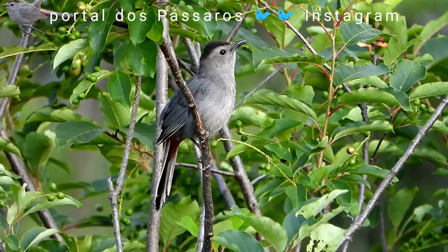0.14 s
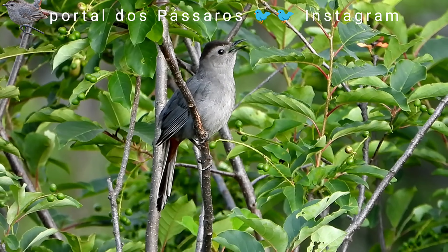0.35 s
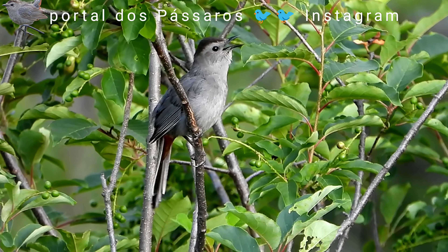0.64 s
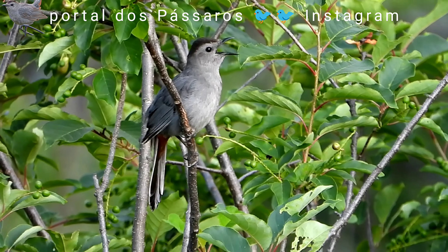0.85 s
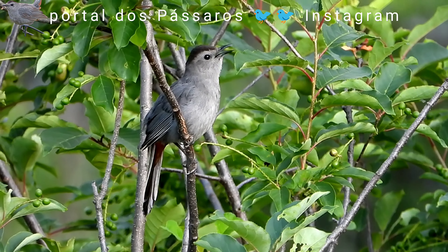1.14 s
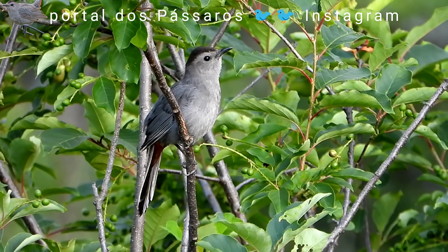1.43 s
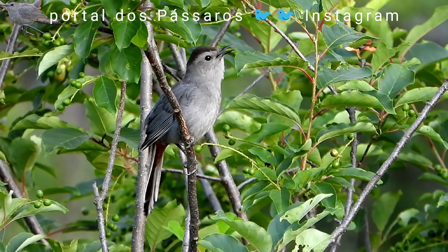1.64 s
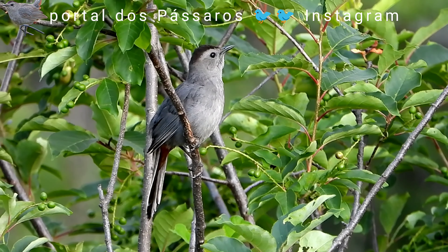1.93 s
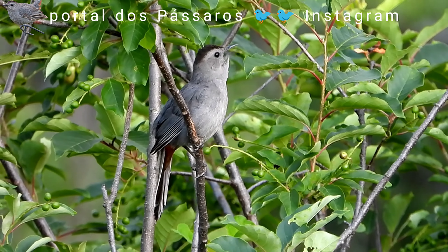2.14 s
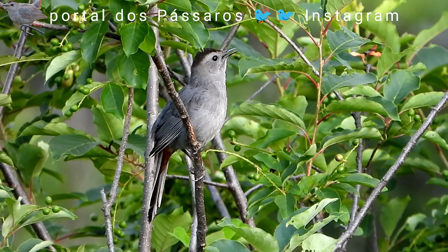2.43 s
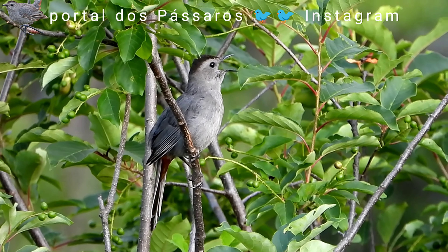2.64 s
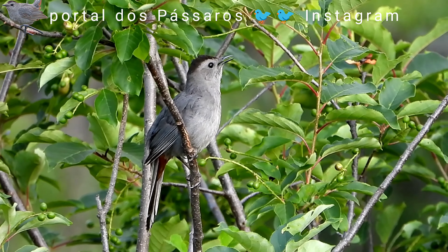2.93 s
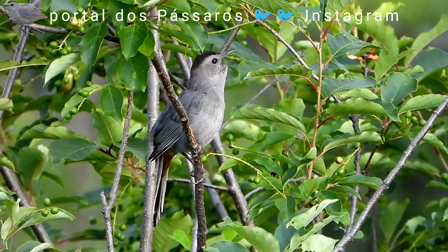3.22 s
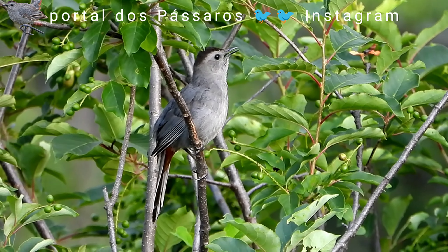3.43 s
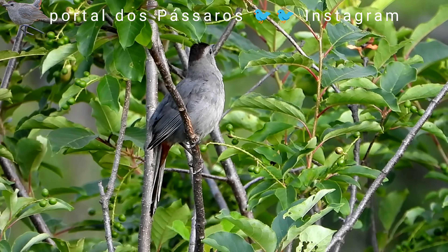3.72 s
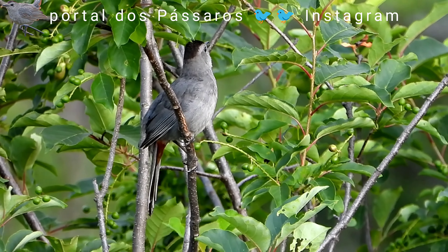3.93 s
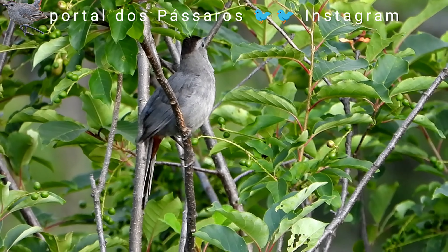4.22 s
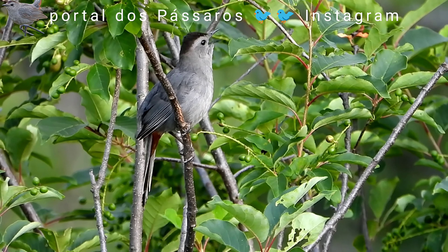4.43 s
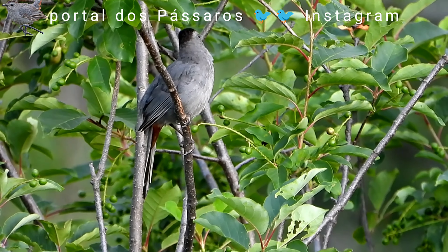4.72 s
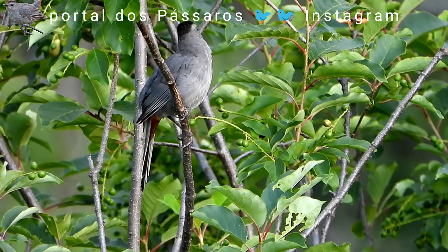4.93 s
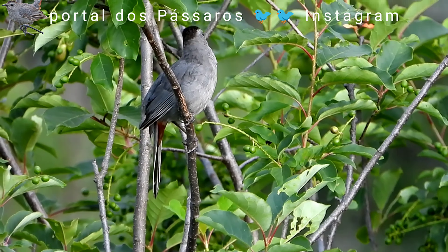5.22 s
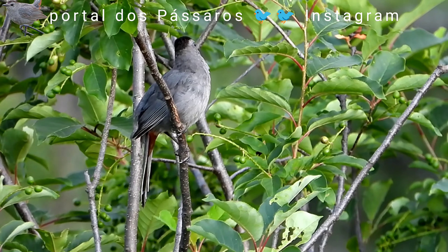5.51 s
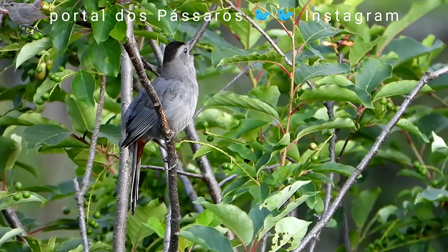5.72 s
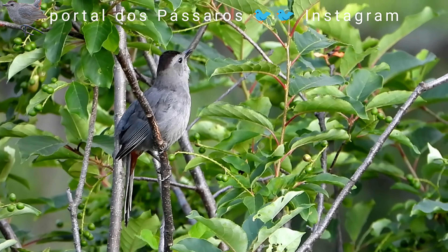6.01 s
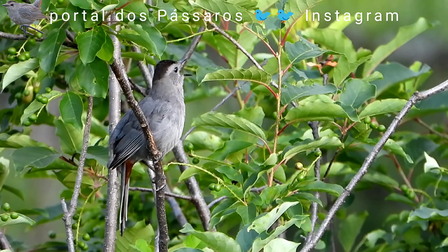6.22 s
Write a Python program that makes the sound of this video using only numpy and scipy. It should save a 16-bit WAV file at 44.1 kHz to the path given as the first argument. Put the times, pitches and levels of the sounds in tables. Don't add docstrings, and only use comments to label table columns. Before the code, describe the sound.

Rapid jumbled birdsong outdoors: sharp chirps, squeaky twitters, hoarse churrs and bending whistles, with faint neighbouring birds and distant traffic behind.

```python
import sys
import numpy as np
from scipy import signal
from scipy.io import wavfile
from scipy.ndimage import uniform_filter1d, minimum_filter1d, map_coordinates

SR = 44100
rng = np.random.default_rng(int(sys.argv[2]) if len(sys.argv) > 2 else 0)


def rack_gain(trim_db):
    fader = np.asarray(trim_db, float)
    return 10 ** (fader / 20)


def file_out(sig):
    cols = np.atleast_2d(sig).T
    lim = np.clip(cols, -1, 1)
    pcm = np.round(lim * 32767).astype(np.int16)
    wavfile.write(sys.argv[1], SR, pcm)


N = 280917
LEFT_RIGHT = np.array([[1], [-1]])


def unit(x):
    return x / np.sqrt(np.mean(x ** 2))


def walk(rate_hz, size):
    hold = int(SR / rate_hz)
    steps = np.repeat(rng.standard_normal(size // hold + 3), hold)
    slewed = uniform_filter1d(uniform_filter1d(steps, hold), hold)
    return unit(slewed)[hold:hold + size]


def patches(shape, bins, frames):
    field = uniform_filter1d(rng.standard_normal(shape), bins, axis=0)
    return unit(uniform_filter1d(uniform_filter1d(field, frames, axis=1), frames, axis=1))


def band_pass(x, hz, width_hz):
    edges = np.clip([hz - width_hz / 2, hz + width_hz / 2], 15, SR / 2 - 500)
    return signal.sosfilt(signal.butter(3, edges, "bandpass", fs=SR, output="sos"), x)


def add(out, start_s, sound):
    first = max(int(start_s * SR), 0)
    n = min(sound.shape[1], N - first)
    out[:, first:first + n] += sound[:, :n]


# time_s, level_db
ROAD = [(0.0, -33.5), (0.03, -39), (0.89, -35.5), (0.9, -39.5), (1.76, -43), (1.81, -39), (2.52, -43),
        (3.05, -38.5), (3.14, -43), (3.73, -46), (4.45, -41.5), (5.2, -48), (5.43, -44), (6.37, -47)]
# pitch_hz, level_db (per Hz)
AIR = [(15, -62), (25, -31), (70, -29), (203, -4.5), (430, -8), (843, 2), (1230, -4), (1830, -9),
       (2460, -7), (7030, -25.5), (7960, -25.5), (9720, -56.5), (12600, -112), (21400, -120)]
# pitch_hz, side_minus_mid_db
AIR_WIDTH = [(30, -6), (70, -2), (150, -7), (280, -17), (600, -21), (1100, -12), (2500, -9), (5000, -3),
             (9000, -1)]


def background(level_db=-39.5):
    hz, t, (mid, side) = signal.stft(rng.standard_normal((2, N)), SR, nperseg=2048)
    s, roar_db = np.transpose(ROAD)
    roar = np.interp(t, s, roar_db - roar_db.mean())
    hz = hz[:, None] + 1
    air_hz, air_db = np.transpose(AIR)
    air = np.interp(np.log(hz), np.log(air_hz), air_db)
    width_hz, width_db = np.transpose(AIR_WIDTH)
    side_db = np.interp(np.log(hz), np.log(width_hz), width_db)
    traffic = roar * np.clip(np.minimum(2200 / hz - .4, (hz - 130) / 400), 0, 1)
    streaks = 4.3 * patches(mid.shape, bins=4, frames=3) + 0.9 * patches(mid.shape, bins=30, frames=8)
    streaks = streaks + np.clip(hz / 3000 - 1, 0, 2) * 1.5 * patches(mid.shape, bins=70, frames=10)
    gusts = np.clip(250 / hz, 0, 3) * 1.3 * patches(mid.shape, bins=8, frames=2)
    spread = mid + rack_gain(side_db) * side * LEFT_RIGHT[:, :, None]
    both = rack_gain(air + traffic + streaks + gusts) * spread
    return unit(signal.istft(both, SR, nperseg=2048)[1][:, :N]) * rack_gain(level_db)


# pitch_hz, start_s, end_s, level_db
DRONES = [
    (484, 0.0, .7, -53),
    (484, 1.5, 2.2, -55),
    (240, 5.68, 5.93, -52),
    (570, 5.6, 5.95, -55),
]


def drones():
    t, out = np.arange(N) / SR, 0
    for hz, start, end, db in DRONES:
        swell = np.clip(np.minimum(t - start + 0.019, end - t) / 0.012, 0, 1)
        level = swell * rack_gain(db + 3.5 * walk(7.7, N))
        pitch = hz + 4 * walk(1.6, N) + 2.5 * walk(30, N)
        out = out + level * np.sin(2 * np.pi * np.cumsum(pitch) / SR)
    return out


def whistle(note, octave_db, pan_db, rough, edge_s=0.006):
    s, hz, db = np.transpose(note)
    t = s[0] - edge_s + np.arange(int((s[-1] - s[0] + 2 * edge_s) * SR)) / SR
    pitch = uniform_filter1d(np.interp(t, s, hz), size=100, mode="nearest")
    tremor_hz = 260 * rough ** 1.5 * walk(400, len(t))
    phase = 2 * np.pi * np.cumsum(pitch + tremor_hz) / SR
    flutter = 1 + .95 * rough * walk(260, len(t))
    flutter = flutter + (.04 + .5 * rough) * walk(1500, len(t))
    fade = np.clip(np.minimum(t - t[0], t[-1] - t) / (2 * edge_s), 0, 1)
    side = LEFT_RIGHT / 2
    lead = 0.39 * pan_db * side
    throat_db = -9 * np.abs(np.log2(2 * pitch / 5600)) / 0.7
    unsteady_db = 4 * walk(70, len(t)) * (octave_db < -12)
    second = rack_gain(octave_db + throat_db - throat_db.max() + unsteady_db)
    third = rack_gain(1.9 * min(octave_db, 0) - 18) * (3 * pitch < 15000)
    tone = np.sin(phase + lead) + second * np.sin(2 * phase + lead)
    tone = tone + third * (np.sin(3 * phase) + rack_gain(-10.5) * np.sin(4 * phase))
    even_power = np.sqrt(2 / (1 + second ** 2) / (1 + (0.49 * rough) ** 2))
    level = rack_gain(np.interp(t, s, db) + pan_db * side) * even_power
    return s[0] - edge_s, tone * level * flutter * np.sin(fade * np.pi / 2) ** 2


# time_s, left_minus_right_db
HEAD = [(0.0, 2), (0.34, 1.5), (0.41, 5.5), (0.64, -4), (0.71, 2.5), (0.76, 1.5), (1.42, 1.5), (2.02, 2),
        (2.04, 0.5), (3.28, 2), (5.45, 0.5), (5.52, 5.5), (6.1, 2), (6.37, 1.5)]
# octave_db, roughness (0-1), and for crisp notes edge_s
CLEAR, SQUEAKY, HOARSE, FAINT, BREATHY = (-33, .13), (8, .09), (-40, .8), (-42, .12), (-42, .45)
REEDY, SCRATCHY, RINGING, SMOOTH = (-17, .2), (-40, .6), (-27, .1), (-36, .04)
BEATING, CRISP = (-32, .15), (-32, .24, .002)


def sing(out, voice, notes):
    octave_db, rough, *edge_s = voice
    for note in notes:
        pan_db = np.interp(note[1][0], *np.transpose(HEAD))
        add(out, *whistle(note, octave_db, pan_db, rough, *edge_s))


# length_share, share_of_way_to_last_pitch, first_pitch_factor, swell_db
SLIDE = [(0, 0, 1, -6), (.42, .42, 1, 0), (1, 1, 1, -7)]
HOOK = [(0, 0, 1, -5), (.3, .92, 1, 0), (1, 1, 1, -6)]
ARCH = [(0, 0, .92, -4), (.3, 0, .995, 0), (.6, .15, 1, -1), (1, 1, 1, -2.5)]


def gesture(shape, start, length, first, last, db):
    return [(start + at * length, lift * first + way * (last - first), db + swell)
            for at, way, lift, swell in shape]


# start_s, length_s, first_or_top_pitch_hz, last_pitch_hz, level_db
CLEAR_SLIDES = [
    (1.28, 0.021, 3220, 3210, -28.5),
    (1.304, 0.013, 2697, 4030, -24),
    (2.424, 0.035, 2750, 2550, -27.5),
    (3.489, 0.024, 1950, 2150, -40),
    (4.849, 0.034, 2750, 3740, -28),
    (4.829, 0.016, 4200, 6760, -33.5),
    (4.836, 0.027, 6400, 6540, -36.5),
    (5.957, 0.023, 3630, 3670, -34),
]
CLEAR_HOOKS = [
    (1.045, 0.036, 1960, 2304, -31.5),
]
CLEAR_ARCHES = [
    (2.031, 0.039, 2820, 1950, -34.5),
    (4.815, 0.025, 3990, 2880, -27.5),
]
SQUEAKY_ARCHES = [
    (1.151, .011, 3230, 3000, -21),
    (1.186, .015, 3500, 3400, -22),
    (1.172, .007, 2950, 2850, -29),
]
HOARSE_SLIDES = [
    (2.915, .04, 5100, 4500, -35),
]
HOARSE_ARCHES = [
    (.05, .045, 3000, 2300, -34),
]
FAINT_SLIDES = [(.52, .018, 7400, 8500, -33), (1.1, .04, 7300, 8700, -39), (1.112, .033, 2200, 1730, -37),
                (.68, .06, 4000, 4300, -38), (1.815, .075, 5950, 5500, -41), (2.006, .034, 2080, 1700, -38),
                (2.25, .045, 5100, 2800, -49), (1.345, .015, 7700, 8500, -37),
                (1.104, .014, 5050, 5300, -25), (2.892, .04, 7900, 6900, -37),
                (3.065, .055, 4400, 4540, -34), (3.12, .03, 4550, 5250, -39), (3.16, .022, 4900, 5300, -38),
                (4.198, .08, 7280, 6850, -48), (4.785, .02, 3060, 2070, -38),
                (4.845, .025, 7500, 7420, -41), (5.3, .02, 2680, 3460, -41)]
FAINT_ARCHES = [
    (1.22, .015, 7000, 6500, -25),
    (1.246, .006, 7100, 6800, -33),
    (2.115, .02, 2250, 1840, -33),
    (3.185, .085, 5250, 4400, -36),
    (3.818, .02, 3300, 2200, -33),
    (5.82, .04, 2590, 2080, -33),
]
BREATHY_SLIDES = [(.25, .012, 6100, 6050, -39), (.545, .05, 4300, 5150, -42), (5.205, .03, 4500, 5250, -52),
                  (5.33, .11, 2400, 2450, -47), (5.36, .09, 2950, 3000, -48), (6.1, .045, 2750, 3000, -41),
                  (.79, .06, 1980, 2050, -33), (.755, .055, 4250, 5050, -41),
                  (3.378, .055, 3200, 2850, -32), (1.67, .05, 4200, 5000, -50),
                  (1.915, .03, 4700, 4000, -47), (1.512, .02, 4100, 4700, -44),
                  (3.445, .025, 4900, 5800, -44), (2.695, .008, 2300, 2300, -32),
                  (2.79, .06, 2700, 5000, -41), (1.152, .13, 5680, 5620, -34), (1.75, .06, 4060, 4100, -44),
                  (3.385, .055, 6250, 5750, -41), (3.612, .018, 3250, 3250, -31),
                  (3.7, .035, 2850, 2700, -36), (3.87, .025, 2780, 2750, -37),
                  (3.903, .018, 3100, 3200, -35), (3.975, .012, 3250, 3200, -35),
                  (6.14, .08, 3650, 3900, -42), (5.31, .14, 1700, 1780, -43), (5.48, .04, 3800, 2300, -36),
                  (5.55, .03, 2500, 2190, -41), (5.908, .007, 7070, 7000, -29),
                  (5.918, .019, 7500, 7780, -33)]
BREATHY_ARCHES = [
    (1.535, .06, 4700, 4400, -50),
    (.03, .062, 3650, 2600, -33),
    (1.0, .045, 2760, 2500, -34),
    (6.205, .033, 2790, 1940, -36),
]
RINGING_HOOKS = [
    (.305, .12, 4780, 4950, -32),
    (3.743, .017, 3350, 3520, -15.5),
    (2.82, .035, 1950, 2520, -30),
]
SCRATCHY_HOOKS = [
    (5.5, .09, 3750, 3500, -37),
]


def short_notes():
    out = np.zeros((2, N))
    for voice, shape, rows in [
            (CLEAR, SLIDE, CLEAR_SLIDES), (CLEAR, HOOK, CLEAR_HOOKS), (CLEAR, ARCH, CLEAR_ARCHES),
            (SQUEAKY, ARCH, SQUEAKY_ARCHES), (HOARSE, SLIDE, HOARSE_SLIDES), (HOARSE, ARCH, HOARSE_ARCHES),
            (FAINT, SLIDE, FAINT_SLIDES), (FAINT, ARCH, FAINT_ARCHES), (BREATHY, SLIDE, BREATHY_SLIDES),
            (BREATHY, ARCH, BREATHY_ARCHES), (RINGING, HOOK, RINGING_HOOKS),
            (SCRATCHY, HOOK, SCRATCHY_HOOKS)]:
        sing(out, voice, [gesture(shape, *row) for row in rows])
    return out


def rasp(middle, length, hz, width_hz, db):
    n = int(1.805 * length * SR)
    slaps = (rng.random(n) < 900 / SR) * rng.standard_normal(n)
    near = unit(unit(slaps) + 3.0 * rng.standard_normal(n))
    stray = rng.standard_normal(n)
    buzz = unit(band_pass(near + min(hz / 9000, 1) * stray * LEFT_RIGHT, hz, width_hz))
    level = rack_gain(db + 0.87 * LEFT_RIGHT + 2.0 * walk(90, n))
    return middle - 0.86 * length, buzz * np.hanning(n) ** 0.72 * level


def strands(x, spread_db=4.0):
    z = signal.stft(x, SR, nperseg=1024)[2]
    z = z * rack_gain(spread_db * patches(z.shape[1:], bins=3, frames=3) + 3.0)
    return signal.istft(z, SR, nperseg=1024)[1][:, :N]


# middle_s, length_s, throat_pitch_hz, level_db
CHURRS = [(0.072, 0.082, 3000, -36.5), (0.333, 0.16, 3870, -39), (0.831, 0.14, 3080, -35.5),
          (1.374, 0.036, 2850, -34.5), (1.893, 0.023, 3580, -39.5), (2.364, 0.059, 2960, -32),
          (2.705, 0.038, 3760, -38.5), (2.777, 0.1, 2790, -39), (3.29, 0.073, 2810, -35.5),
          (4.391, 0.31, 4410, -46.5), (4.763, 0.11, 3300, -40), (5.056, 0.041, 2440, -38.5),
          (5.544, 0.09, 3700, -40), (5.997, 0.052, 3080, -32.5), (6.196, 0.14, 3100, -53.5)]
HISSES = [(.035, 0.06, 6760, -46.5), (0.265, 0.052, 5360, -47), (0.833, 0.18, 7350, -53),
          (1.105, 0.052, 5540, -30), (1.201, 0.12, 6540, -37), (1.362, 0.042, 7200, -43),
          (1.79, 0.091, 5470, -45.5), (2.391, 0.066, 6750, -37), (2.708, 0.069, 6470, -50.5),
          (3.281, 0.066, 6720, -45), (4.086, 0.075, 6900, -51), (4.64, 0.12, 5200, -45),
          (5.057, 0.044, 5840, -52.5), (5.361, 0.15, 5360, -49.5), (5.946, 0.064, 6940, -43),
          (3.89, 0.2, 4320, -46), (5.992, 0.058, 6880, -43.5)]
CLUCKS = [
    (1.376, 0.027, 1420, -44.5),
    (6.003, 0.045, 1420, -45.5),
]
SHEENS = [(0.277, 0.061, 10400, -56.5), (1.818, 0.031, 10500, -61.5), (1.89, 0.069, 10700, -62.5),
          (3.014, .07, 10440, -66.5), (4.217, 0.084, 13300, -60.5), (5.438, 0.053, 8800, -62.5),
          (5.533, 0.063, 8700, -62), (2.724, 0.066, 8650, -60), (2.87, 0.13, 9140, -55.5),
          (3.308, .12, 8800, -58), (4.679, 0.098, 8700, -65), (0.56, 0.12, 8600, -56.5),
          (4.836, 0.028, 10000, -63), (6.365, .05, 11700, -55)]


def harsh_notes():
    harsh = np.zeros((2, N))
    for width, rows in ((.62, CHURRS), (.37, HISSES), (.25, CLUCKS), (.25, SHEENS)):
        for middle, length, hz, db in rows:
            add(harsh, *rasp(middle, length, hz, width * hz, db))
    return strands(harsh)


# time_s, pitch_hz, level_db
SLURS = [
    [(0.865, 3295, -36), (0.871, 3345, -21.5), (0.885, 2730, -20.5), (0.893, 2574, -14), (0.903, 2483, -22),
     (0.917, 2610, -19.5), (0.925, 2700, -24), (0.935, 2520, -38)],
    [(6.29, 3100, -26.5), (6.298, 3230, -31), (6.312, 2580, -19.5), (6.326, 2420, -23), (6.332, 2354, -19),
     (6.352, 2270, -26.5), (6.362, 2370, -27), (6.364, 2500, -39), (6.369, 2700, -12)],
    [(3.518, 2194, -31), (3.528, 2270, -22), (3.542, 2633, -16), (3.558, 2680, -42)],
    [(1.902, 2622, -41), (1.906, 2650, -26), (1.914, 2290, -24), (1.922, 2290, -22.5), (1.938, 2050, -30),
     (1.945, 2060, -35)],
    [(1.965, 2720, -34), (1.975, 2830, -24.5), (1.979, 2730, -25), (1.983, 2740, -45), (1.987, 2890, -27),
     (1.997, 2590, -27), (2.008, 2565, -30)],
    [(2.71, 2283, -32), (2.728, 2255, -21), (2.754, 1950, -28.5), (2.76, 1951, -36.5)],
    [(4.047, 3370, -24), (4.059, 3825, -21), (4.075, 3830, -21.5), (4.093, 3436, -14.5),
     (4.099, 3325, -18.5), (4.105, 2900, -23), (4.115, 2590, -19), (4.12, 2485, -23)],
    [(0.695, 3386, -38), (0.705, 3425, -26), (0.719, 3139, -27), (0.737, 2866, -29), (0.745, 2326, -37),
     (0.755, 2230, -25), (0.763, 1990, -23.5), (0.773, 1990, -30), (0.79, 2080, -29)],
]
WARBLES = [
    [(3.432, 2990, -23.5), (3.445, 3258, -30.5), (3.453, 3540, -20), (3.461, 3540, -13),
     (3.467, 3875, -19.5), (3.479, 3830, -19), (3.487, 3470, -12.5), (3.5, 2140, -25.5)],
    [(4.12, 2460, -25), (4.136, 2256, -21), (4.16, 2312, -22), (4.172, 2430, -26), (4.182, 2694, -23.5),
     (4.195, 1900, -33.5), (4.21, 1950, -38)],
    [(3.232, 2690, -42), (3.237, 3470, -21), (3.244, 3540, -18), (3.25, 3500, -23.5), (3.253, 3500, -40)],
]
HIGH_SLURS = [
    [(4.615, 6200, -33), (4.626, 6600, -31.5), (4.636, 6300, -36), (4.648, 7000, -41.5), (4.662, 6400, -32)],
    [(2.319, 6660, -25), (2.323, 6900, -31), (2.33, 7500, -35), (2.338, 7700, -26), (2.356, 7800, -33),
     (2.372, 7740, -33)],
]
QUAVERS = [
    [(5.305, 3730, -42), (5.317, 3792, -35), (5.337, 3560, -27.5), (5.343, 4060, -33.5), (5.349, 3850, -30),
     (5.359, 4170, -32.5), (5.403, 4048, -34), (5.429, 4180, -35), (5.46, 3950, -41)],
]
REEDY_SLURS = [
    [(1.22, 3380, -18), (1.225, 3510, -29.5), (1.238, 3510, -27), (1.248, 3670, -25), (1.258, 3560, -28),
     (1.266, 3050, -24.5), (1.271, 2650, -27)],
    [(4.012, 2650, -23.5), (4.02, 2850, -30.5), (4.029, 2490, -23), (4.036, 3400, -24), (4.044, 2310, -22)],
]
SQUEAKY_SLURS = [
    [(2.845, 2480, -27.5), (2.858, 2650, -32), (2.866, 2574, -20.5), (2.895, 2617, -17), (2.906, 2550, -21),
     (2.911, 2480, -26), (2.93, 2230, -31.5)],
    [(1.114, 2770, -21), (1.119, 2813, -20), (1.124, 2870, -26), (1.13, 2825, -18.5), (1.137, 2773, -28),
     (1.144, 2840, -14), (1.149, 2770, -30)],
]
HOARSE_SLURS = [
    [(5.938, 6500, -36), (5.955, 4850, -37), (5.968, 4250, -35), (5.979, 4950, -34)],
]
PIPS = [
    [(5.98, 4940, -23), (5.985, 5280, -20), (5.991, 5190, -27.5), (5.998, 5360, -29)],
]
SMOOTH_SLURS = [
    [(2.998, 3400, -38), (3.005, 3525, -28), (3.027, 3240, -22), (3.063, 3008, -26), (3.083, 2745, -30),
     (3.093, 2590, -42)],
    [(4.597, 2745, -34.5), (4.611, 2755, -29), (4.659, 3140, -25), (4.721, 2577, -32), (4.73, 2450, -40)],
    [(2.466, 2470, -34), (2.48, 2230, -32.5), (2.505, 2250, -32), (2.518, 2100, -38)],
    [(.46, 3900, -48), (.48, 4130, -45), (.52, 4140, -43), (.54, 4270, -48)],
]
BEATING_SLURS = [
    [(4.495, 6470, -37.5), (4.53, 6030, -35.5), (4.56, 5840, -35.5), (4.6, 5890, -28.5), (4.612, 5740, -29),
     (4.64, 5720, -35), (4.665, 5640, -43)],
]


def slurs(beat_hz=105):
    out = np.zeros((2, N))
    sing(out, SMOOTH, SMOOTH_SLURS)
    sing(out, CRISP, SLURS + WARBLES + PIPS)
    sing(out, SQUEAKY, SQUEAKY_SLURS)
    sing(out, REEDY, REEDY_SLURS)
    sing(out, SCRATCHY, HOARSE_SLURS + HIGH_SLURS)
    sing(out, BEATING, BEATING_SLURS)
    sing(out, BEATING, [[(s, hz + beat_hz, db) for s, hz, db in note] for note in BEATING_SLURS])
    sing(out, FAINT, QUAVERS)
    return out


def rattle(first_s=1.0605, spacing_s=0.0087, db=-29, count=4):
    t = np.arange(int(count * spacing_s * SR)) / SR
    puffs = np.exp(-(t % spacing_s) / .0011) * rack_gain(db + 120 * t)
    clatter = unit(band_pass(rng.standard_normal(len(t)), 4500, 4600))
    return first_s, puffs * clatter * np.ones((2, 1))


def roll(start, length, first, last, db, roll_hz=143, sharpness=1.6):
    t = np.arange(int(length * SR)) / SR
    turn = 2 * np.pi * np.cumsum(roll_hz * (1 + .15 * walk(80, len(t)))) / SR
    flick = 1 + .03 * np.sin(turn) + .035 * walk(400, len(t))
    pitch = first * (last / first) ** (t / length) * flick
    puffs = (np.sin(turn / 2) ** 2) ** sharpness
    level = rack_gain(db + 6.5 + 1.0 * walk(180, len(t))) * np.sin(np.pi * t / length) ** 0.17
    return start, puffs * level * np.sin(2 * np.pi * np.cumsum(pitch) / SR) * rack_gain(LEFT_RIGHT)


# start_s, length_s, first_pitch_hz, last_pitch_hz, level_db
ROLLS = [
    (3.268, .084, 3250, 2250, -31),
    (2.376, .056, 5700, 2750, -30),
    (5.518, .075, 3750, 3480, -33),
]


def birds():
    out = short_notes() + harsh_notes() + slurs()
    add(out, *rattle())
    for row in ROLLS:
        add(out, *roll(*row))
    return out


def thicket(x, near_db=-16, near_t60=.09, far_db=-13, far_t60=.8, sway_s=.00006, sway_hz=50):
    t = np.arange(SR) / SR
    mid, side = rng.standard_normal((2, SR))
    grain = mid + 0.57 * side * LEFT_RIGHT
    near = np.exp(-np.log(1000) * t / near_t60) * np.minimum(t / .004, 1)
    far = np.exp(-np.log(1000) * t / far_t60) * np.minimum(t / .04, 1)
    tail = (rack_gain(near_db) * unit(near) + rack_gain(far_db) * unit(far)) * grain / np.sqrt(SR)
    echo = signal.fftconvolve(x.mean(axis=0)[None], tail, axes=1)[:, :N]
    swayed = np.arange(N) + sway_s * SR * walk(sway_hz, N)
    return np.array([map_coordinates(ear, [swayed], mode="nearest") for ear in echo])


def scene():
    song = birds()
    return background() + drones() + song + thicket(song)


def masking(x, quiet_db=-92, below_db=-30, bins=16):
    hz, t, z = signal.stft(x, SR, nperseg=2048)
    power = (np.abs(z[:, :-1]) ** 2).mean(axis=0)
    band = power.reshape(-1, bins, len(t)).mean(axis=1)
    loud = -minimum_filter1d(-band, size=9, axis=0)
    band_hz = np.arange(len(band))[:, None] * bins * hz[1]
    treble = np.clip((band_hz - 7000) / 2000, -2.5, 1)
    whim_db = 6.5 * patches(band.shape, bins=1, frames=2)
    floor = rack_gain(2 * (quiet_db + 8 * treble)) + loud * rack_gain(2 * (below_db + 4 * treble))
    keep = band * rack_gain(2 * whim_db) > floor
    z[:, :-1] *= np.repeat(keep, bins, axis=0)
    return signal.istft(z, SR, nperseg=2048)[1][:, :N]


def top_cut(x):
    return signal.sosfilt(signal.butter(12, 15100, fs=SR, output="sos"), x)


def record(dry):
    rounded = np.tanh(1.278 * dry) / 1.005
    dull = signal.sosfilt(signal.butter(3, 9700, fs=SR, output="sos"), rounded)
    hiss = rack_gain(-81) * rng.standard_normal(N)
    return top_cut(masking(dull) + hiss)


dry = scene()
out = record(dry)
file_out(out)
```